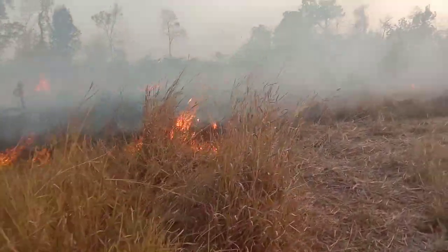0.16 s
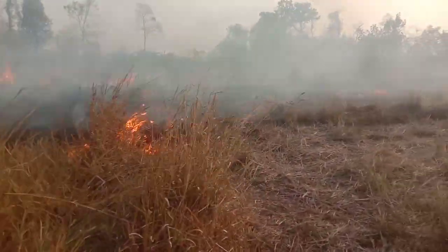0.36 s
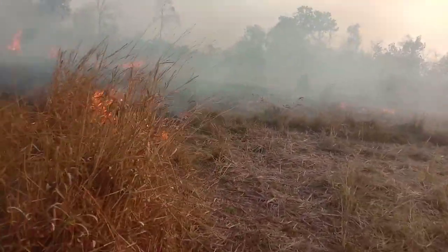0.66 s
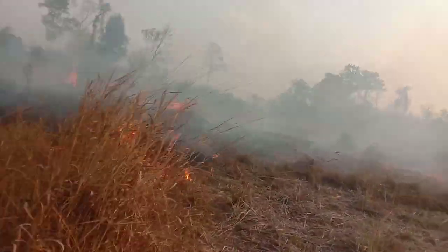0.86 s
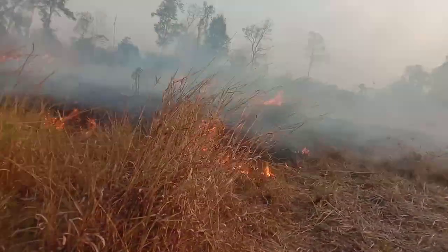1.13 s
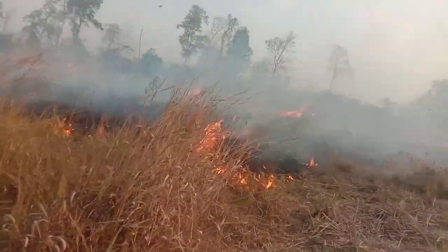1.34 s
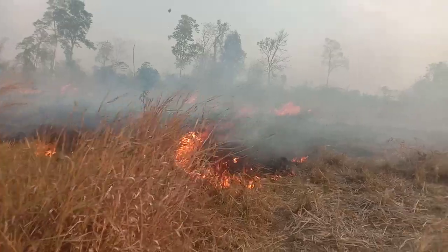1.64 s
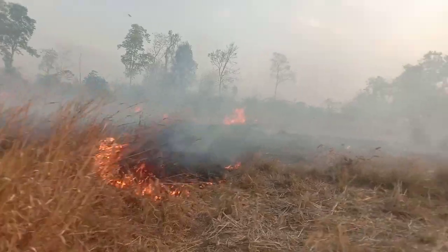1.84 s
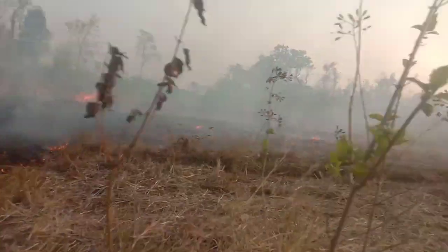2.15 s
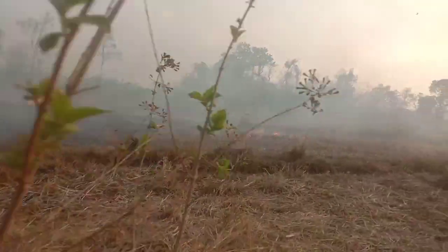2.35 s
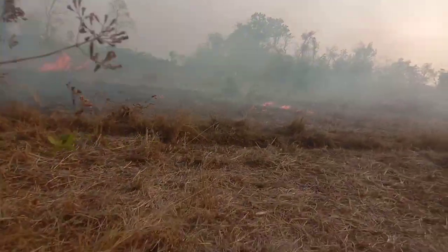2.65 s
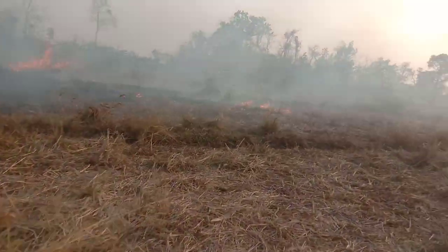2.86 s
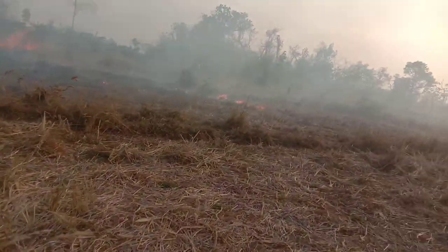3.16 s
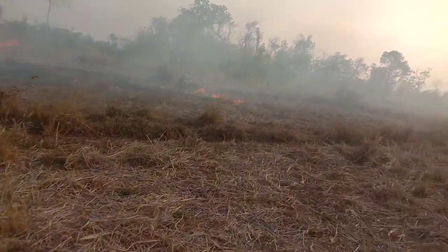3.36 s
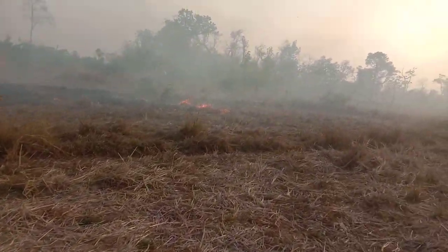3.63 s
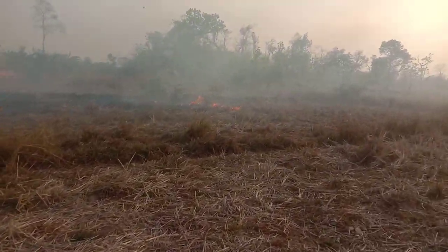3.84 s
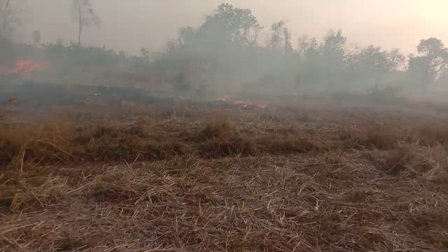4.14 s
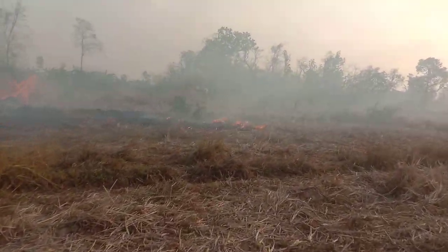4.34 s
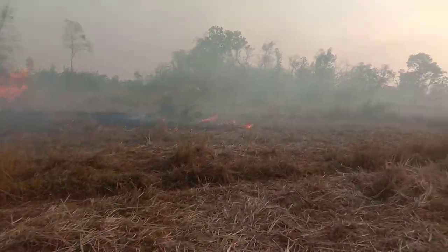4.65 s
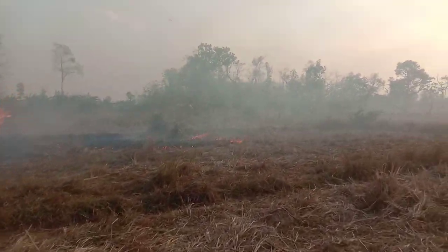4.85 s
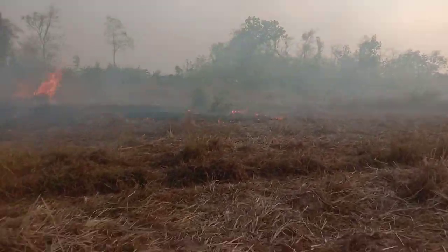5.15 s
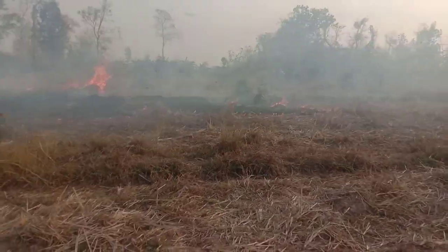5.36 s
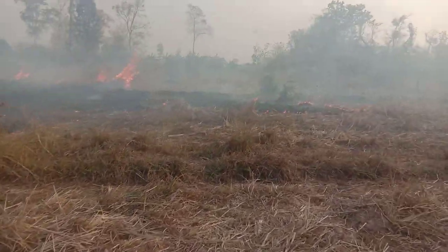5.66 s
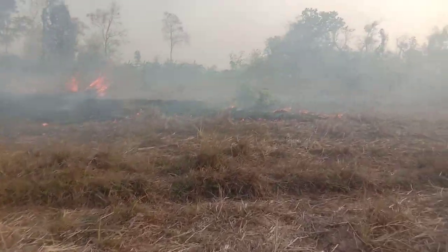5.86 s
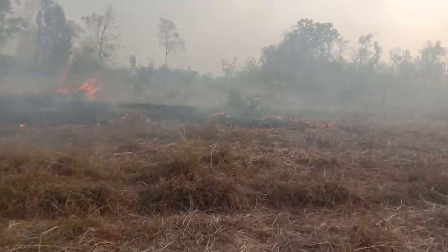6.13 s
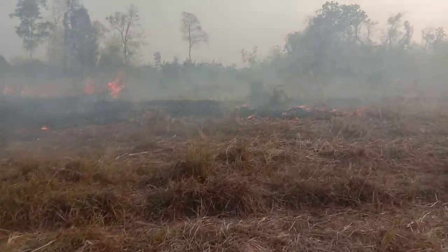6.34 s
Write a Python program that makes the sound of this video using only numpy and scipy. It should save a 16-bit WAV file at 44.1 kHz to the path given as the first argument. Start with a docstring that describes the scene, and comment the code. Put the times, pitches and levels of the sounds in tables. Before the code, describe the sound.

An open-field grass fire heard through a small, slightly boxy, band-limited microphone carried along it. Bright irregular snapping dominates the opening, with low woody pops from thicker stalks. Then it becomes sparser and duller, with a few late cracks around three seconds, before blurred crackle and thin sizzle lead. Soft straw crunches come unevenly, a faint rush flutters behind, and wind rumbles in lumps. No echo.

```python
"""A fire runs through dry grass, heard for 6.5 seconds on a small microphone carried along it.
At first nearby stalks burst in crowded sharp snaps, with hollow pops from thick stalks among them.
Between 2 and 2.9 s the microphone turns away: the snaps grow duller and their list thins out.
Then the fire front's blur of small pops and fine sizzle leads, strongest near 4.8 and 5.3 s.
Throughout, straw crunches underfoot, gusts of filtered noise rumble and a faint rush flutters."""
import sys
import numpy as np
from scipy import signal
from scipy.fft import rfft, irfft, next_fast_len
from scipy.io import wavfile
from scipy.ndimage import map_coordinates

SR = 44100
rng = np.random.default_rng(int(sys.argv[2]) if len(sys.argv) > 2 else 0)


def output_pcm(signal):
    """Save a mono or channel-first signal as 16-bit PCM at the path in sys.argv[1].

    Samples are clipped to [-1, 1] before scaling.
    """
    pcm = np.clip(np.atleast_2d(signal).T, -1, 1) * 32767
    wavfile.write(sys.argv[1], SR, np.round(pcm).astype(np.int16))


N = 286650  # length in samples

# how far the microphone has turned from the nearest burning tuft: (time_s, turned from 0 to 1)
TURN = [(2, 0), (2.9, 0.95)]
# tufts of grass catching alight: (start_s, hold_s, popping_db, sizzle_db)
FLARES = [(0, 0.12, -46.5, -39.5), (0.265, 0.07, -51.5, -39.5), (0.666, 0.025, -42, -33.5),
          (0.95, 0.22, -66, -45), (1.208, 0.22, -48.5, -43), (1.53, 0.2, -50.5, -44.5),
          (1.996, 0.039, -57.5, -39), (2.343, 0.16, -67, -42.5), (2.544, 0.03, -56, -53),
          (2.99, 0.17, -49.5, -44.5), (4.427, 0.03, -51, -43), (4.718, 0.15, -60, -44.5),
          (4.903, 0.14, -45, -39.5), (5.272, 0.12, -54, -38.5), (6.042, 0.013, -46.5, -47),
          (6.144, 0.079, -50, -43.5), (6.327, 0.066, -44, -49)]


def amp(db):
    """Turn decibels into a gain."""
    return 10 ** (np.asarray(db) / 20)


def unit(x):
    """Scale a sound to an rms level of 1."""
    return x / np.sqrt(np.mean(x ** 2) + 1e-20)


def along(points, hz):
    """Read (frequency_hz, value) points on a logarithmic frequency axis."""
    point_hz, values = np.transpose(points)
    return np.interp(np.log(hz + 1), np.log(point_hz), values)


def curve(rows):
    """Join (time_s, value) rows with straight lines, one value per sample."""
    return np.interp(np.arange(N) / SR, *np.transpose(rows))


def wobble(rate):
    """Draw a smooth random curve through this many random points a second."""
    knots = rng.standard_normal(int(N * rate / SR) + 4)
    return map_coordinates(knots, [np.arange(N) * rate / SR])


def filtered(x, response):
    """Multiply the spectrum of x by a complex response of frequency."""
    # the padding leaves room for ringing past the end
    m = 2 * next_fast_len(N // 2 + SR // 4)
    return irfft(rfft(x, m) * response(np.fft.rfftfreq(m, 1 / SR)), m)[:N]


def causal(gain):
    """Build the minimum-phase response with this gain: it rings only after a blow."""
    cepstrum = irfft(np.log(gain))
    half = len(cepstrum) // 2
    # fold the part before time zero onto the part after it
    cepstrum[1:half] *= 2
    cepstrum[half + 1:] = 0
    return np.exp(rfft(cepstrum))


def coloured(x, points):
    """Pass x through the causal filter with these (frequency_hz, gain_db) points."""
    return filtered(x, lambda hz: causal(amp(along(points, hz))))


def noise(spectrum):
    """Make random noise of rms 1 shaped by (frequency_hz, relative_level_db) points."""
    return unit(filtered(rng.standard_normal(N), lambda hz: amp(along(spectrum, hz))))


def swells(rows, attack_s, release_s):
    """Gain of (start_s, hold_s, level_db) events that rise before the start, hold and die away."""
    t = np.arange(N) / SR
    power = np.zeros(N)
    for start_s, hold_s, level_db in rows:
        before = np.maximum(start_s - t, 0) / attack_s
        after = np.maximum(t - start_s - hold_s, 0) / release_s
        # overlapping events add in power
        power += (amp(level_db) * np.exp(-(before + after))) ** 2
    return np.sqrt(power)


def burning(front_db, tufts):
    """Gain of a fire sound: the front, rising and falling and almost silent near 3.15 s, plus flaring tufts."""
    # how hard the flame front burns, before front_db is added: (time_s, level_db)
    blaze = [(0.0, -35), (0.12, -46.5), (0.33, -46.5), (0.58, -44.5), (0.76, -41.5), (1.45, -47),
             (1.8, -45), (1.92, -46.5), (2.25, -45.5), (2.72, -47), (2.81, -50.5), (2.9, -39), (3.15, -79),
             (3.23, -46), (3.32, -46), (3.78, -42.5), (4.0, -47.5), (4.2, -42), (4.55, -42.5), (4.78, -34),
             (5.03, -43), (5.12, -45), (5.3, -34), (5.72, -39.5), (5.87, -44), (6.5, -45.5)]
    front = amp(curve(blaze) + front_db)
    # front and tufts add in power
    return np.hypot(front, swells(tufts, attack_s=.03, release_s=.045))


def bursts(s, db, pitch_hz, q, splinter_db, splinter_t60, scatter_db, scatter_t60, size=768):
    """Each stalk breaks with an impulse and a splintering rattle; grass around it scatters a short tail."""
    t, hz = np.arange(size) / SR, np.fft.rfftfreq(size, 1 / SR)

    def fade(t60):
        """Decay by 60 dB in t60 seconds, scaled to unit energy."""
        decay = amp(-60 * t / t60)
        return decay / np.linalg.norm(decay)

    splinter = amp(splinter_db) * fade(splinter_t60)
    scatter = amp(scatter_db) * fade(scatter_t60)
    push = rng.standard_normal((len(s), size)) * np.hypot(splinter, scatter)
    push[:, 0] = 1  # the break itself
    # the hollow stalk is one damped resonance; the finite time of the break dulls the top
    u = 1j * hz / pitch_hz[:, None]
    stalk = u / (1 + u / np.reshape(q, (-1, 1)) + u * u)
    dulling = 1 / (1 + u / 2)
    pops = irfft(rfft(push) * stalk * dulling)
    # db sets the total energy of each pop
    pops *= (amp(db) / np.linalg.norm(pops, axis=1))[:, None]
    at = np.maximum(s * SR, 0).astype(int)[:, None] + np.arange(size)
    return np.bincount(at.ravel(), pops.ravel(), N)[:N]


def swarm(count, clump_db, clump_rate, spread_db, range_db, centre_hz, octaves):
    """Draw random pops in flurries, most tiny and a few large: times, levels, pitches."""
    density = np.cumsum(amp(clump_db * wobble(clump_rate)))
    when, strength, thinness = rng.random((count, 3)).T
    at = np.searchsorted(density, when * density[-1])
    # levels run from 0 to range_db, the higher ones rarer
    db = -spread_db * np.log(strength + (1 - strength) * np.exp(-range_db / spread_db))
    # thin stalks ring higher than thick ones, and the stalks of one flurry are alike
    height = octaves * np.arcsin(2 * thinness - 1) + .3 * wobble(clump_rate)[at]
    return at / SR, db, centre_hz * 2 ** height


def roar():
    """The distant blaze merges into a faint rush: filtered noise with a fluttering level."""
    # colour of the rush: (frequency_hz, relative_level_db)
    rush_colour = [(220, 6.5), (500, -3.5), (1250, -3.5), (1600, -27), (2400, -5.5), (12000, -12.5)]
    return amp(-65 + 2.8 * wobble(12)) * noise(rush_colour)


def wind():
    """Gusts over a light breeze rumble in uneven lumps; eddies and bumps give short low thumps."""
    # gusts at the microphone: (start_s, hold_s, level_db)
    gusts = [(0, 0.26, -51), (.28, 0.043, -45.5), (.56, 0.084, -41.5), (.77, 0.24, -47.5),
             (1.04, 0.33, -52.5), (2.08, 0.089, -54.5), (2.43, 0.076, -48.5), (2.56, 0.088, -43.5),
             (2.8, 0.2, -55), (3.85, 0.01, -52.5), (5.52, 0.25, -50), (5.7, 0.17, -45),
             (6.02, 0.074, -44.5), (6.35, 0.18, -43.5)]
    # colour of the rumble: (frequency_hz, relative_level_db)
    rumble_colour = [(20, -24), (35, -50), (55, -7), (85, 0), (120, -1), (250, -18), (450, -44),
                     (1200, -30)]
    # soft thumps on the microphone: (time_s, peak_db, pitch_hz)
    thumps = [(0.597, -28, 97), (2.198, -41.5, 127), (2.442, -31, 92.5), (2.635, -37, 185),
              (2.932, -43, 88.5), (5.776, -28, 94), (6.383, -34, 98), (6.484, -41, 314)]
    breeze_db = -58.5
    strength = np.hypot(amp(breeze_db), swells(gusts, attack_s=.02, release_s=.085))
    lumps_db = 3.1 * wobble(16)
    air = strength * amp(lumps_db) * noise(rumble_colour)
    for time_s, peak_db, pitch_hz in thumps:
        cycles = (np.arange(N) / SR - time_s) * pitch_hz
        air += amp(peak_db) * np.sin(2 * np.pi * cycles) * np.exp(-cycles ** 2)
    return air


def crunch():
    """Each crunch is a mat of straw giving way, at uneven spacing: a swell of soft, hollow little cracks."""
    # straw giving way, before the overall 3.5 dB lift: (start_s, hold_s, level_db)
    steps = [(0, 0.11, -58.5), (.35, 0.16, -60), (.7, 0.069, -58.5), (1.88, 0.11, -65.5), (2.45, 0.04, -57),
             (3.09, 0.067, -58.5), (3.74, 0.07, -53), (4.33, 0.15, -58.5), (4.72, 0.16, -56.5),
             (4.95, 0.032, -51.5), (5.258, 0.014, -50.5), (5.54, 0.089, -59), (5.83, 0.015, -69),
             (6.16, 0.22, -60)]
    # tone of trodden straw: (frequency_hz, gain_db)
    straw_tone = [(200, 20), (500, -12), (850, -2.5), (1250, 1), (1600, -1.5), (2500, -3), (4500, 12.5),
                  (9000, -73)]
    s, db, pitch_hz = swarm(count=3000, clump_db=2.5, clump_rate=45, spread_db=4.5, range_db=13,
                            centre_hz=1600, octaves=.62)
    cracks = bursts(s, db, pitch_hz, q=5, splinter_db=2, splinter_t60=.0028,
                    scatter_db=2, scatter_t60=.028)
    gain = amp(3.5) * swells(steps, attack_s=.034, release_s=.045)
    return gain * unit(coloured(cracks, straw_tone))


def sizzle():
    """Fine blades give tiny bright ticks over a thin hiss; the front's share drops as the mic turns."""
    # bright colour of both ticks and hiss: (frequency_hz, gain_db)
    hiss_colour = [(5000, -12.5), (7000, -4), (13500, 3), (15000, 4.5)]
    s, db, pitch_hz = swarm(count=2200, clump_db=3.5, clump_rate=24, spread_db=5.5, range_db=18,
                            centre_hz=11000, octaves=.4)
    ticks = bursts(s, db, pitch_hz, q=3, splinter_db=4, splinter_t60=.003,
                   scatter_db=-3, scatter_t60=.016, size=384)
    tufts = [(start_s, hold_s, sizzle_db) for start_s, hold_s, _, sizzle_db in FLARES]
    # a full turn would take 8 dB off the front
    gain = burning(-2 - 8 * curve(TURN), tufts)
    return gain * (unit(coloured(ticks, hiss_colour)) + amp(-3.5) * noise(hiss_colour))


def crackle():
    """Along the front, small dry ticks stand out from a blur of farther pops, each with a short ring."""
    # tone of the popping front: (frequency_hz, gain_db)
    front_tone = [(300, 10.5), (900, -6.5), (1650, -2.5), (2200, 3.5), (3000, -3), (5000, 0), (8000, 0),
                  (15000, 6)]
    s, db, pitch_hz = swarm(count=4100, clump_db=2.9, clump_rate=40, spread_db=3.7, range_db=13,
                            centre_hz=3800, octaves=.38)
    q = rng.lognormal(np.log(4.6), .75, len(s))
    far = bursts(s, db, pitch_hz, q, splinter_db=3, splinter_t60=.005,
                 scatter_db=-2, scatter_t60=.032)
    s, db, pitch_hz = swarm(count=440, clump_db=2.2, clump_rate=40, spread_db=7.5, range_db=10,
                            centre_hz=4300, octaves=.45)
    q = rng.lognormal(np.log(2.8), .7, len(s))
    near = bursts(s, db, pitch_hz, q, splinter_db=4, splinter_t60=.003,
                  scatter_db=-8, scatter_t60=.02)
    # the sharp ticks recede once the tuft is out of line
    presence = amp(1.2 - 4.5 * curve(TURN))
    tufts = [(start_s, hold_s, popping_db) for start_s, hold_s, popping_db, _ in FLARES]
    gain = burning(-8, tufts)
    return gain * unit(coloured(unit(far) + presence * unit(near), front_tone))


def knocks():
    """Thick stalks give low hollow pops with a brief flutter, many of them under a snap."""
    # thick stalks, before the tone filter: (time_s, energy_db, pitch_hz)
    thick_stalks = [(.006, -11.5, 610), (0.232, -21.5, 730), (0.4135, -17.5, 740), (0.5385, -14, 990),
                    (0.552, -28, 680), (0.709, -10.5, 980), (0.7969, -15, 850), (0.806, -15.5, 915),
                    (1.1155, -25, 533), (1.1995, -30, 900), (1.3318, -15, 1010), (1.6687, -11.5, 910),
                    (2.1847, -11.5, 830), (2.5798, -13.5, 283), (2.6448, -15, 835), (3.283, -12, 830),
                    (3.502, -10, 370), (5.686, -16, 418), (6.3714, -21.5, 633)]
    s, db, pitch_hz = np.transpose(thick_stalks)
    pops = bursts(s, db, pitch_hz, q=1.8, splinter_db=-6, splinter_t60=.005,
                  scatter_db=-5, scatter_t60=.04, size=2048)
    # inverted so that they add to a snap at the same moment
    return -coloured(pops, [(1000, -3), (1300, -3.5)])


def snaps():
    """Near stalks burst one by one, too thin to radiate bass; they lose top as the microphone turns."""
    # the loudest nearby stalks, before the filters: (time_s, energy_db, pitch_hz, resonance_q without unit)
    near_stalks = [(0.0061, -1.5, 2950, 0.84), (0.041, -8, 6790, 0.74), (0.058, -9, 5680, 0.88),
                   (0.0689, -7, 4610, 2.3), (0.1578, -10, 4300, 5), (0.2318, 1, 4400, 4.8),
                   (0.2701, -13.5, 3850, 6.5), (0.302, -14.5, 3420, 0.48), (0.3208, -11.5, 4340, 1.9),
                   (0.354, -13, 6210, 1.5), (0.3956, -11.5, 4750, 0.18), (0.403, -8, 6440, 0.74),
                   (0.414, -11.5, 2840, 1.3), (0.4881, -9.5, 5350, 1.1), (0.4946, -11.5, 3380, 1.9),
                   (0.5388, -8, 2560, 3.5), (0.5468, -8.5, 6460, 2.7), (0.551, -3.5, 6940, 0.58),
                   (0.678, -7, 4230, 4.7), (0.6807, -7, 4460, 2.9), (0.707, 0, 5800, 4.7),
                   (0.7128, -13, 4090, 0.66), (0.7707, -4, 3680, 0.44), (0.781, -7.5, 3630, 0.63),
                   (0.795, -11.5, 1980, 1.4), (0.8583, -9.5, 4000, 3.4), (0.8733, -17.5, 2180, 3.6),
                   (0.885, 3, 4830, 0.18), (0.926, -12.5, 3870, 2.1), (0.9582, -10, 4890, 0.73),
                   (0.971, 0.5, 5470, 0.53), (0.9753, -7, 4040, 1.1), (1.0042, -9.5, 3930, 3.4),
                   (1.0671, -11.5, 5600, 2.5), (1.1155, -20, 1810, 2.1), (1.1457, -9.5, 4280, 3.1),
                   (1.2003, -11, 3420, 0.62), (1.2067, -14, 4300, 0.96), (1.24, -16, 5850, 1.6),
                   (1.3323, -4.5, 2540, 1.7), (1.3463, -8, 6500, 0.96), (1.4393, -13.5, 6850, 2.1),
                   (1.5196, -16, 4580, 8.1), (1.5882, -4.5, 4640, 3.7), (1.5987, -7, 3810, 2.4),
                   (1.61, -12.5, 3400, 1.6), (1.616, -12, 3760, 3.5), (1.6692, -1.5, 3500, 0.39),
                   (1.7285, -10, 7100, 2.4), (1.687, -18.5, 3870, 0.9), (1.978, -18.5, 3470, 1.2),
                   (2.0677, -4.5, 2750, 2.1), (2.186, -2, 1960, 1.35), (2.251, -15, 7000, 1.6),
                   (2.304, -15, 5350, 1.2), (2.326, -15, 3330, 0.85), (2.3695, -16, 3360, 1.4),
                   (2.5636, -10.5, 4250, 0.47), (2.5698, -12, 4500, 2.5), (2.5799, -12, 1600, 0.88),
                   (2.6135, -17.5, 3120, 1.1), (2.645, -11, 2210, 4.7), (2.6708, -4, 4150, 1.6),
                   (2.758, -22, 3580, 0.21), (2.765, -16.5, 2430, 1.2), (2.8465, -7.5, 2940, 0.72),
                   (2.8812, -8, 4250, 0.85), (2.9943, -15.5, 7000, 0.54), (3.0482, -18, 4650, 3.3),
                   (3.0763, -17.5, 5470, 1.6), (3.0852, -16.5, 3050, 0.55), (3.1311, -17.5, 5700, 0.42),
                   (3.284, -5, 3170, 1.2), (3.3599, -4.5, 4040, 0.86), (3.3748, -19, 3320, 0.46),
                   (3.502, -1, 4640, 0.38), (3.662, -17.5, 5000, 0.97), (4.0849, -19, 2310, 4.2),
                   (4.3479, -21.5, 3800, 2.3), (4.5596, -18.5, 2770, 1.6), (4.6495, -20.5, 4030, 1.3),
                   (4.6612, -17, 3500, 2.9), (4.6962, -14.5, 3550, 1.2), (4.7159, -13.5, 2900, 1.5),
                   (4.8095, -14, 3270, 8.7), (4.8365, -19, 2500, 3.8), (4.9036, -19, 4300, 1.7),
                   (5.0268, -19, 3740, 1.5), (5.153, -13, 3400, 3.5), (5.3352, -19, 4610, 1.3),
                   (5.5387, -20, 2300, 0.98), (5.7677, -14, 4440, 1.1), (6.0237, -14.5, 3550, 3.6),
                   (6.163, -23, 1490, 4.6), (6.2115, -22, 1600, 2.5), (6.2855, -20.5, 3750, 3.4),
                   (6.3724, -13.5, 2400, 4.8)]
    s, db, pitch_hz, q = np.transpose(near_stalks)
    pops = bursts(s, db, pitch_hz, q, splinter_db=1.5, splinter_t60=.0029,
                  scatter_db=-8, scatter_t60=.03, size=2048)
    no_bass = signal.butter(2, 600, "highpass", fs=SR, output="sos")
    pops = signal.sosfilt(no_bass, pops)
    away = np.clip(curve(TURN), 0, 1)
    facing = coloured(pops, [(6000, -1.5), (9000, 5.0), (14000, 6.0)])
    turned = coloured(pops, [(5800, 3.5), (9000, 4.0), (14000, 0)])
    return (1 - away) * facing + away * turned


def scene():
    """Fire, crunching straw and wind reach one microphone, the same in both channels."""
    mono = snaps() + knocks() + crackle() + sizzle() + roar() + crunch() + wind()
    return np.array([mono, mono])


def port(hz, ring_hz=1252, width_hz=76):
    """The cavity behind the microphone port is a narrow resonance."""
    return 1j * hz * width_hz / (ring_hz ** 2 - hz ** 2 + 1j * hz * width_hz)


def record(dry):
    """The microphone colours everything, rings at its port and keeps nothing above its band limit."""
    # the microphone's response apart from its port: (frequency_hz, gain_db)
    mic_tone = [(100, 1), (950, 1), (1150, -1.5), (1430, -3), (1750, 1), (3000, 1), (5500, 5), (6100, -1.5),
                (6600, -16), (7200, -11.5), (8300, -22), (9800, -17.5), (11300, -29.5), (14000, -27),
                (15350, -10.5), (15650, -42)]
    top_hz = 16300

    def response(hz):
        """Tone, port ring and band limit together."""
        return causal(amp(along(mic_tone, hz))) * (1 + 4.52 * port(hz)) * (hz < top_hz)

    return np.array([filtered(channel, response) for channel in dry])


dry = scene()
out = record(dry)
output_pcm(out)
```